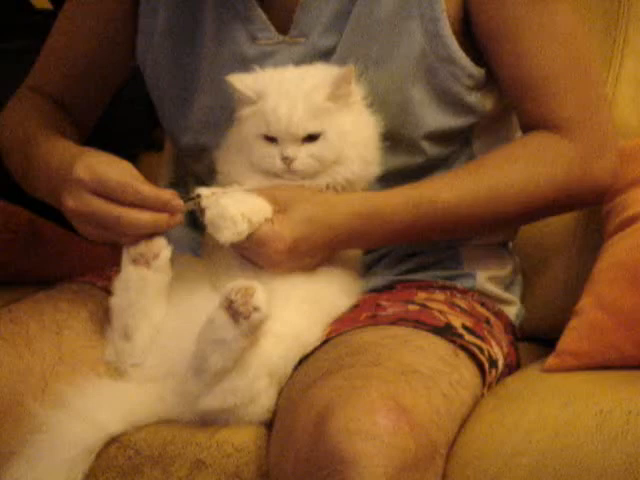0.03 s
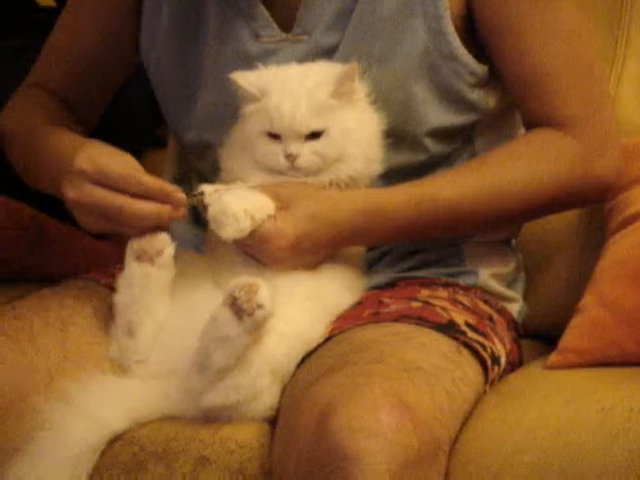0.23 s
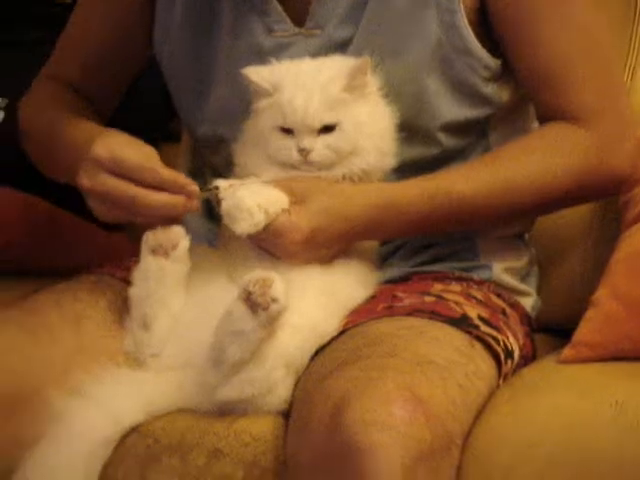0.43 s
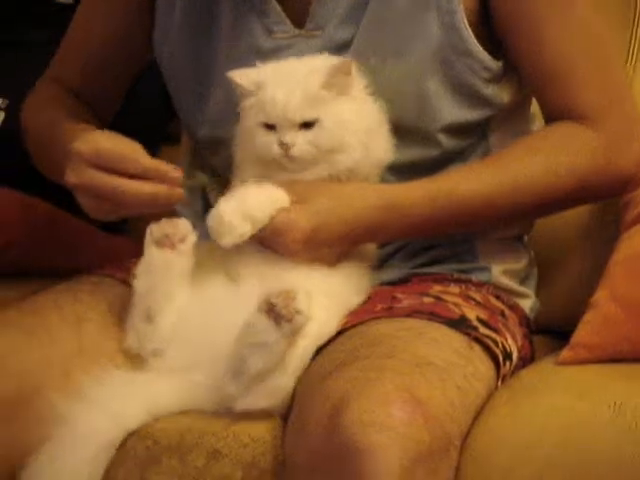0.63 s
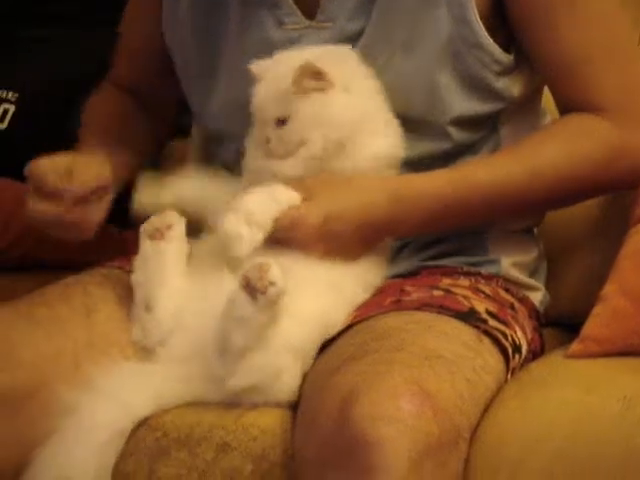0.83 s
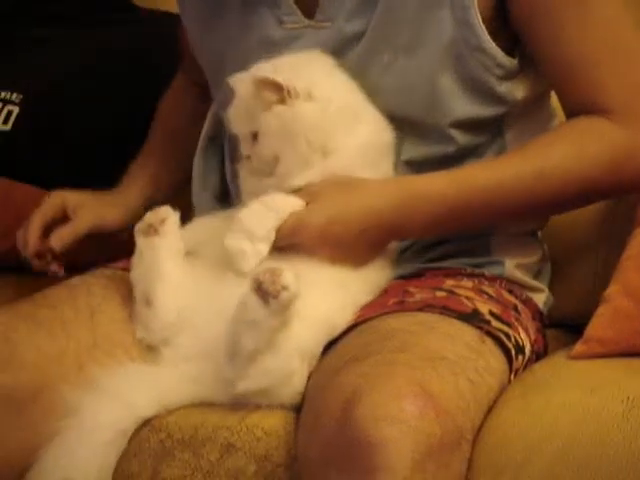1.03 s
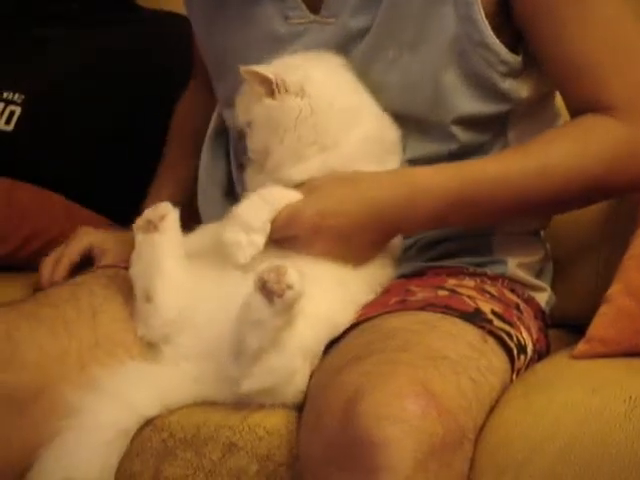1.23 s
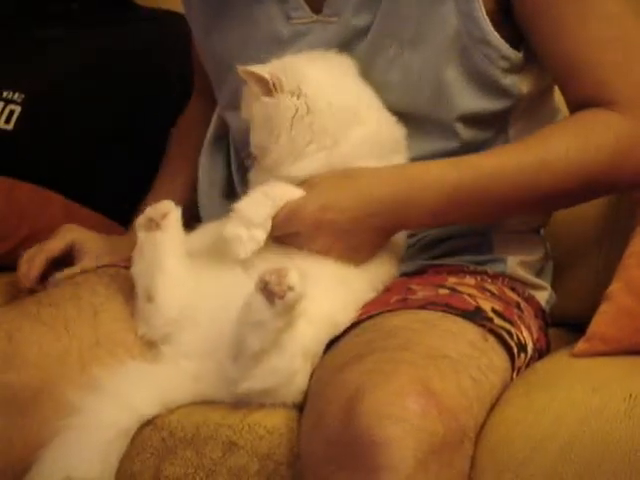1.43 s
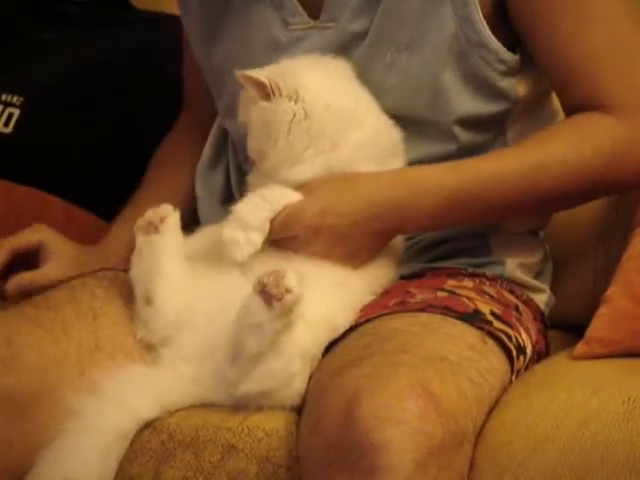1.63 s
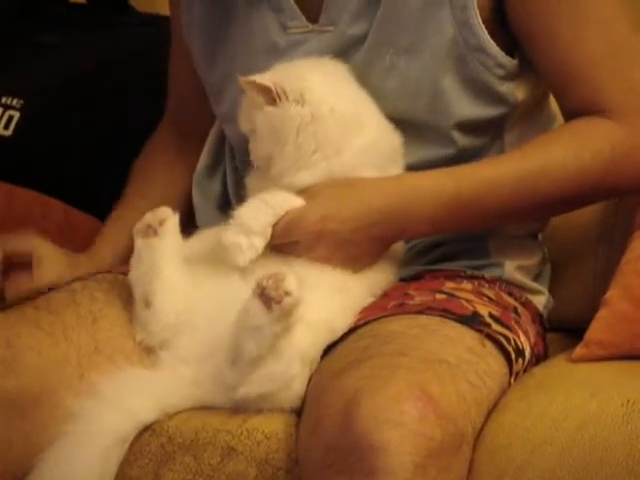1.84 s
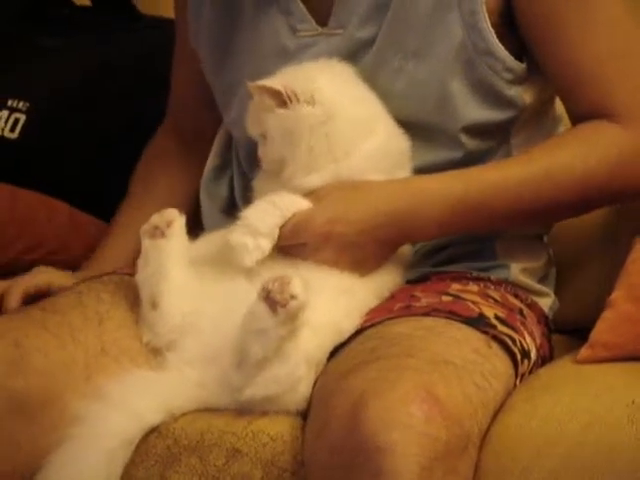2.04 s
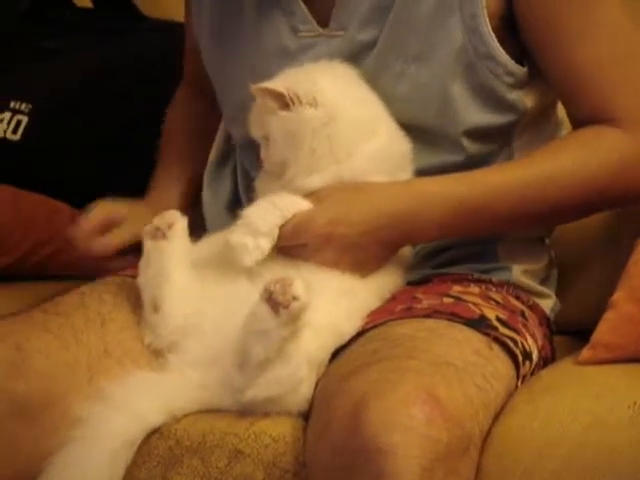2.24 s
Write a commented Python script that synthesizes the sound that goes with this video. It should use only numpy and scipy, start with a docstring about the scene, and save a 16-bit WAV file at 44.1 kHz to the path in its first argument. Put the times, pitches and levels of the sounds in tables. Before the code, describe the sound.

A nail clipper snips a cat's claw once, over a steadily running fan.

```python
"""A small, hard-walled room, where a fan runs and a cat's claw is clipped.
The microphone switches on with a soft pop and a short buzz. Close by, the squeezed claw creaks,
then fractures as the steel jaws snap shut; the impulse sets the room ringing.
The lever ticks as it is let go, and fingers rustle on fur. Later the clipper is put down on a seat,
whose damped modes give a dull knock while the loose lever clinks faintly."""
import sys
import numpy as np
from scipy import signal
from scipy.fft import rfft, irfft
from scipy.io import wavfile
from scipy.ndimage import uniform_filter1d

SR = 44100
rng = np.random.default_rng(int(sys.argv[2]) if len(sys.argv) > 2 else 0)


def bounce(signal):
    """Save signal as a 16-bit WAV file at the path given by the first command-line argument."""
    frames = np.transpose(np.atleast_2d(signal))
    limited = np.clip(frames, -1, 1)
    pcm = np.round(limited * 32767).astype(np.int16)
    wavfile.write(sys.argv[1], SR, pcm)


N = 101429
TIME = np.arange(N) / SR

# The fan's rush of air. Each row: frequency in Hz, relative spectral density in dB.
AIR_SPECTRUM = [(30, 4), (60, -7), (100, -4.5), (150, -4), (215, -5), (250, -4.5), (330, -4.5), (450, -7.5),
                (690, -4.5), (1330, -9), (2830, -13.5), (5500, -21.5), (9800, -28)]
# Its likeness at the two channels. Each row: frequency in Hz, correlation from -1 to 1.
AIR_CORRELATION = [(60, -0.82), (140, -0.35), (330, 0.063), (780, 0.63), (1850, 0.37), (4360, 0.19),
                   (10300, -0.44)]
# The fan's motor. Each row: frequency in Hz, level in dB.
MOTOR_TONES = [(220.7, -68), (360.7, -66.5), (807.5, -70.5), (1104, -62.5), (2067, -72), (2250, -71)]
# The fan's stereo balance. Each row: frequency in Hz, left minus right in dB.
FAN_PAN = [(60, 2), (140, -3.5), (330, -5.0), (780, -4.5), (1850, -1.5), (4360, -0.5), (10300, 0.0)]
# The fan's slight swell. Each row: time in seconds, gain in dB.
FAN_GAIN = [(0.16, 0.5), (0.55, .6), (0.9, 0), (1.9, 0.5), (2.3, 0.36)]
# Faint scrapes: the claw creaks as the jaws squeeze it, then fingers rustle on fur.
# Each row: middle in seconds, half length in seconds, level in dB.
FAINT_SCRAPES = [(0.546, 0.02, -57.5), (1.367, .03, -60), (1.781, 0.027, -60.5), (2.29, 0.0092, -59)]
# The jaws cut through the claw. Each row: start in seconds, relative level in dB.
JAW_BLOWS = [(0.5828, 0), (0.5841, -14.5)]
# The shut clipper. Each row: frequency in Hz, relative level in dB, T60 in seconds,
# left minus right in dB.
SHUT_CLIPPER_MODES = [(3130, -23.5, 0.0051, 4), (4350, -17.5, 0.016, 5), (5100, -15.5, 0.02, 4),
                      (5770, -11.5, 0.004, 16.5), (7570, -5, 0.0015, -9), (8700, -12, 0.0068, -5),
                      (9580, -10.5, 0.0055, -6)]
# What the snap sends to the walls. Each row: frequency in Hz, relative level in dB.
SNAP_SPECTRUM = [(1180, -46), (2000, -21), (2380, -18), (2580, -13), (2950, -17), (3780, -13), (4590, -0.5),
                 (5280, -7.5), (6200, -8), (7230, -12.5), (8050, -13), (9140, -6.5), (9900, -12),
                 (12900, -43), (21800, -120)]
# The room's reverberation time. Each row: frequency in Hz, T60 in seconds.
ROOM_DECAY = [(150, 0.37), (1000, 0.89), (4700, 0.56), (9500, 0.46)]
# The colour of its reverberation. Each row: frequency in Hz, relative level in dB.
ROOM_SPECTRUM = [(150, -3), (1000, -6), (4700, -1), (9500, 2)]
# The lever is let go. Each row: start in seconds, relative level in dB.
LEVER_TICKS = [(0.8842, -36.5), (0.8856, -41.5), (1.0235, -56)]
# The open clipper. Each row: frequency in Hz, relative level in dB.
OPEN_CLIPPER_MODES = [(2300, -13), (3590, -10.5), (5500, -12), (6400, -3.5), (6620, -5), (7650, -7),
                      (9400, -14), (9800, -12)]
# The clipper lands. Each row: start in seconds, relative level in dB.
SEAT_KNOCKS = [(2.012, -26), (2.0142, -32), (2.0237, -34), (2.032, -42), (2.044, -36)]
# The seat beneath it. Each row: frequency in Hz, relative level in dB, T60 in seconds.
SEAT_RESONANCES = [(180, -19, 0.056), (386, -2, 0.0059), (750, -5, 0.0076), (1390, -0.5, 0.0042),
                   (2770, -5, 0.0025)]
# The loose lever bounces. Each row: start in seconds, relative level in dB.
LEVER_CLINKS = [(2.012, -48), (2.0165, -56), (2.023, -39), (2.0285, -44), (2.0445, -48)]
# The lever's own ring. Each row: frequency in Hz, relative level in dB.
LOOSE_LEVER_MODES = [(4600, -13), (5830, -7), (8580, -3.5), (9880, -5)]

MIC_ON_S, SNAP_S = 0.1578, JAW_BLOWS[0][0]
T60_PER_TAU = np.log(1000)   # time constants in a decay of 60 dB


def from_db(db):
    """Amplitude grows tenfold with every 20 dB."""
    return 10 ** (np.asarray(db) / 20)


def unit_rms(x):
    """Dividing by the rms gives unit mean power."""
    return x / np.sqrt(np.mean(x ** 2) + 1e-20)


def at_hz(points, hz):
    """Interpolation on a logarithmic frequency axis."""
    frequencies, values = np.transpose(points)
    return np.interp(np.log(hz), np.log(frequencies), values)


def pan(db):
    """A level difference between left and right places a source."""
    return from_db(np.array([[.5], [-.5]]) * db)


def decay(start, tau):
    """Exponential relaxation of a unit step, with time constant tau."""
    return (TIME >= start) * np.exp(-np.maximum(TIME - start, 0) / tau)


def drift(corner_hz):
    """Low-passed noise gives a slow random fluctuation of unit rms."""
    hz = np.fft.rfftfreq(N, 1 / SR)
    return unit_rms(irfft(rfft(rng.standard_normal(N)) / (1 + (hz / corner_hz) ** 2), N))


def noise_bands(correlation, count):
    """Bands of stereo noise and their centres; the ratio of mid to side sets the correlation."""
    hz = np.fft.rfftfreq(N, 1 / SR)
    mid, side = rfft(rng.standard_normal((2, N)))
    edges = np.geomspace(25, 11000, count + 1)
    for low, high in zip(edges, edges[1:]):
        centre = np.sqrt(low * high)
        alike = np.clip(at_hz(correlation, centre), -1, 1)
        stereo = np.sqrt((1 + alike) / 2) * mid + np.sqrt((1 - alike) / 2) * side * [[1], [-1]]
        yield centre, irfft(stereo * (hz >= low) * (hz < high), N)


def impulses(contacts, spread_db=0):
    """A brief contact acts as an impulse."""
    force = np.zeros(N)
    for start, db in contacts:
        force[int(start * SR)] += from_db(db + spread_db * rng.standard_normal())
    return force


def ring(force, hz, t60):
    """A damped oscillator answers each impulse with a decaying sine."""
    radius, angle = from_db(-60 / (t60 * SR)), 2 * np.pi * hz / SR
    return signal.lfilter([0, np.sin(angle)], [1, -2 * radius * np.cos(angle), radius ** 2], force + 1e-18)


def switch_on(buzz_hz=184, buzz_s=0.026):
    """A switching transient: the microphone buzzes briefly and its offset drains away."""
    buzz = np.sin(2 * np.pi * buzz_hz * (TIME - MIC_ON_S)) * (TIME < MIC_ON_S + buzz_s)
    pop = decay(MIC_ON_S, tau=0.22)
    return from_db(-36) * buzz - from_db(-24.5) * pop


def fan(flicker_db=1.12, waver_hz=6.6):
    """Moving air gives broadband noise; the motor adds tones modulated in phase and amplitude."""
    air = hum = 0
    for hz, band in noise_bands(AIR_CORRELATION, count=52):
        level = from_db(at_hz(AIR_SPECTRUM, hz) + flicker_db * drift(corner_hz=2.7))
        air += band * pan(at_hz(FAN_PAN, hz)) * level
    for hz, db in MOTOR_TONES:
        tone = np.sin(2 * np.pi * hz * TIME + drift(waver_hz)) * (1 + 0.9 * drift(waver_hz))
        hum += from_db(db) * pan(at_hz(FAN_PAN, hz)) * unit_rms(tone)
    swell = from_db(np.interp(TIME, *np.transpose(FAN_GAIN)))
    return (from_db(-45.5) * unit_rms(air) + hum) * swell


def swish(middle_s, half_s, band_hz):
    """Sliding friction gives a band of noise that swells and fades."""
    band = signal.butter(2, band_hz, "band", fs=SR, output="sos")
    envelope = np.exp(-((TIME - middle_s) / half_s) ** 2)
    return envelope * unit_rms(signal.sosfilt(band, rng.standard_normal(N)))


def scrapes():
    """Friction noise: the claw creaks as the jaws squeeze it, then fingers rustle on fur."""
    return sum(from_db(db) * swish(middle, half, band_hz=(2210, 6640))
               for middle, half, db in FAINT_SCRAPES)


def grit(contacts, t60, low_hz):
    """Fracture or grazing contact gives a brief burst of bright noise."""
    envelope = sum(from_db(db) * decay(start, t60 / T60_PER_TAU) for start, db in contacts)
    highpass = signal.butter(2, low_hz, "high", fs=SR, output="sos")
    return signal.sosfilt(highpass, rng.standard_normal((2, N)) * envelope + 1e-18)


def snip(radiation_hz=2500):
    """The claw fractures and impact excites the jaws' modes; so small a body radiates little bass."""
    blows = impulses(JAW_BLOWS)
    steel = sum((-1) ** k * from_db(db) * pan(side_db) * ring(blows, hz, t60)
                for k, (hz, db, t60, side_db) in enumerate(SHUT_CLIPPER_MODES))
    radiation = signal.butter(1, radiation_hz, "high", fs=SR, output="sos")
    crack = from_db(-12) * grit(JAW_BLOWS, t60=0.006, low_hz=3800)
    return signal.sosfilt(radiation, steel) + crack


def radiated_snap():
    """The walls receive one pulse, filtered by the clipper's resonances."""
    hz = np.maximum(np.fft.rfftfreq(N, 1 / SR), 1)
    return irfft(rfft(impulses(JAW_BLOWS[:1])) * from_db(at_hz(SNAP_SPECTRUM, hz)), N)


def room_response(wall_delay_s=0.0094, near_share=0.37, early_gain=0.94):
    """Weak nearby scatter, strong first reflections, then a tail that is absorbed band by band."""
    tail = sum(band * from_db(at_hz(ROOM_SPECTRUM, hz)) * decay(0, at_hz(ROOM_DECAY, hz) / T60_PER_TAU)
               for hz, band in noise_bands(correlation=[(1000, 0.23)], count=16))
    build_up = (TIME >= wall_delay_s) - decay(wall_delay_s, tau=0.0069)
    early = early_gain * decay(wall_delay_s, tau=0.017)
    envelope = near_share + build_up * (1 - near_share + early)
    return unit_rms(tail * envelope) / np.sqrt(2 * N)


def reverb(x, room, wet_db):
    """Reverberation is the convolution of a sound with the room's impulse response."""
    mono = np.atleast_2d(x).mean(axis=0)
    return from_db(wet_db) * signal.fftconvolve(mono[None], room, axes=1)[:, :N]


def limiter(x, threshold_db=-9, window_s=0.0011, release_db_per_s=67):
    """Peak limiting: the gain drops at once under a loud peak and creeps back."""
    power = uniform_filter1d(np.mean(x ** 2, axis=0), int(window_s * SR))
    over_db = np.maximum(10 * np.log10(np.abs(power) + 1e-12) - threshold_db, 0)
    recovery_db = release_db_per_s * TIME
    return x * from_db(recovery_db - np.maximum.accumulate(over_db + recovery_db))


def struck(contacts, modes):
    """Modal superposition: each contact excites every mode with a random strength of its own."""
    return sum(from_db(db) * ring(impulses(contacts, spread_db=5), hz, t60) for hz, db, t60 in modes)


def lever_release(t60=0.013):
    """The lever springs back, steel grazing steel, and the open clipper vibrates freely."""
    steel = struck(LEVER_TICKS, [(hz, db, t60) for hz, db in OPEN_CLIPPER_MODES])
    return steel + from_db(1) * grit(LEVER_TICKS, t60=0.034, low_hz=4500)


def landing():
    """Impact excites the seat's damped modes, and the hand scuffs the cloth."""
    knock = struck(SEAT_KNOCKS, SEAT_RESONANCES)
    scuff = swish(middle_s=2.033, half_s=0.019, band_hz=(130, 1120))
    return knock + from_db(-38.5) * scuff


def lever_rattle(t60=0.013):
    """Repeated impacts excite the loose lever's modes as the clipper lands."""
    steel = struck(LEVER_CLINKS, [(hz, db, t60) for hz, db in LOOSE_LEVER_MODES])
    grazing = from_db(-2) * grit(LEVER_CLINKS, t60=0.053, low_hz=3020)
    return (steel + grazing) * pan(db=6)


def scene():
    """Direct sounds and their reverberation add by superposition, over the fan."""
    room = room_response()
    screened = room * decay(0, tau=0.07)   # low by the lap, the body screens the late reflections
    mix = snip() + reverb(radiated_snap(), room, wet_db=18)
    for sound, wet_db in [(lever_release(), 6), (landing(), 0.5), (lever_rattle(), 1)]:
        mix += sound + reverb(sound, screened, wet_db)
    return mix + scrapes() + fan()


def record(dry, cutoff_hz=10050):
    """The band-limited microphone comes on; the snap jolts it off centre and drives the limiter."""
    jolt = from_db(-24) * decay(SNAP_S, tau=0.01) * pan(db=7)
    live = (limiter(dry) + switch_on() - jolt) * (TIME >= MIC_ON_S)
    lowpass = signal.firwin(401, cutoff_hz, fs=SR)
    return signal.fftconvolve(live, lowpass[None], "same", axes=1)


dry = scene()
out = record(dry)
bounce(out)
```